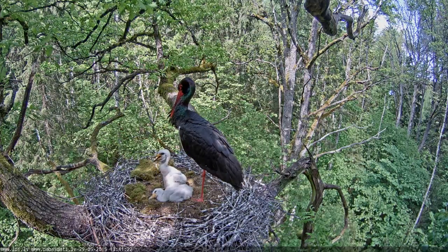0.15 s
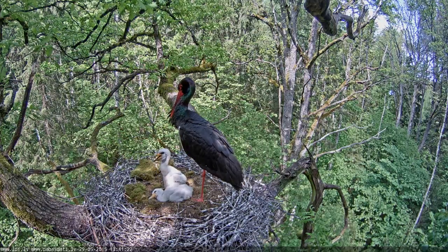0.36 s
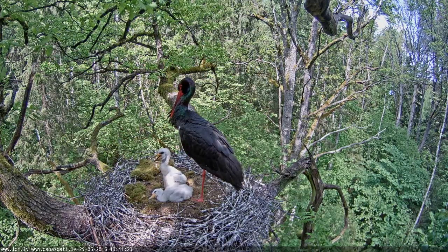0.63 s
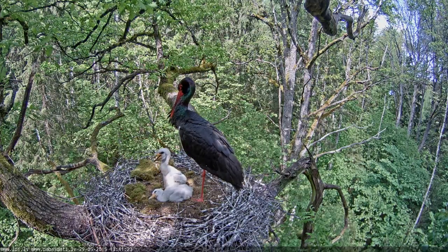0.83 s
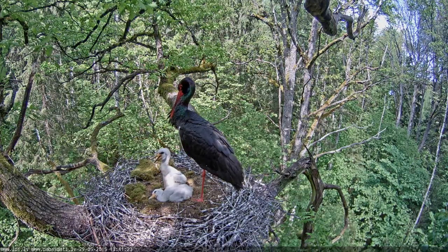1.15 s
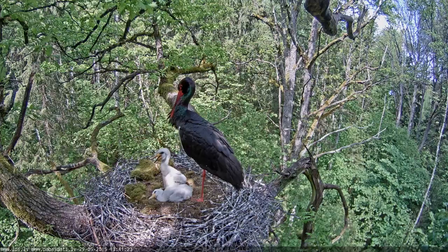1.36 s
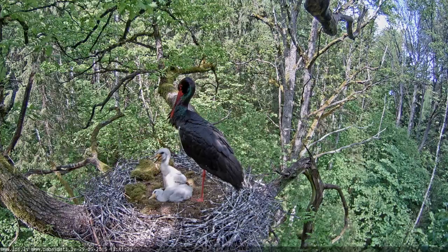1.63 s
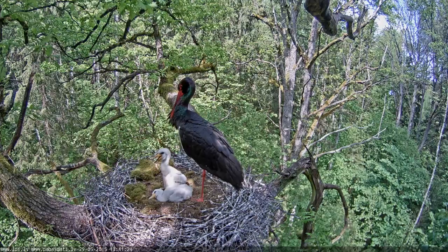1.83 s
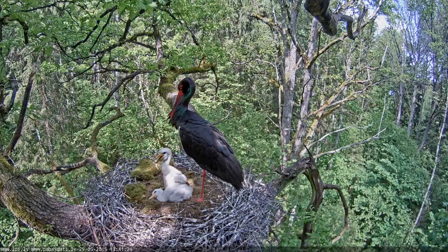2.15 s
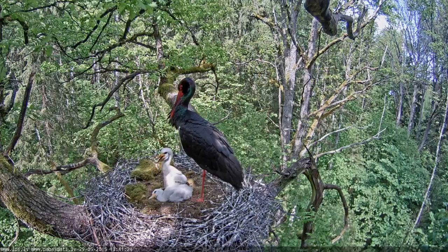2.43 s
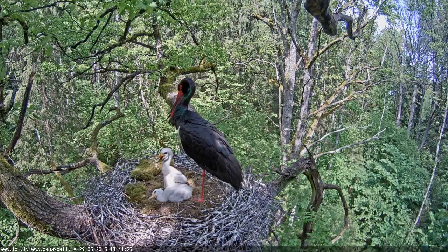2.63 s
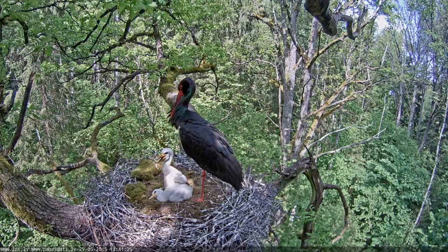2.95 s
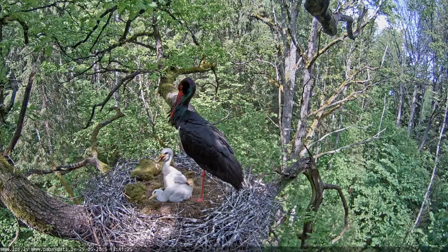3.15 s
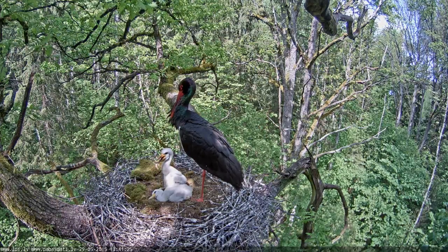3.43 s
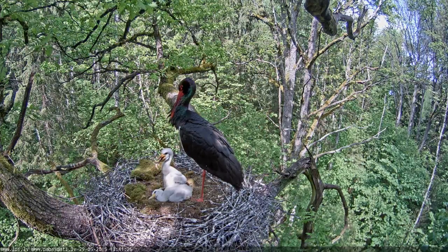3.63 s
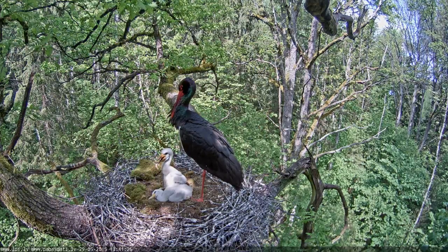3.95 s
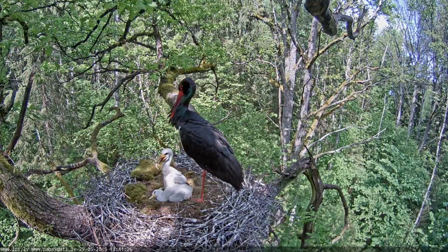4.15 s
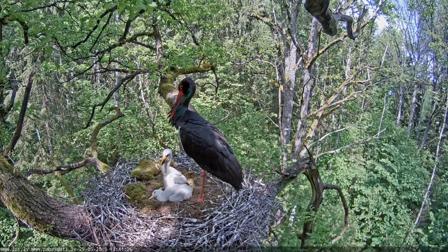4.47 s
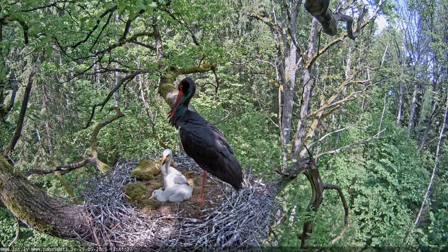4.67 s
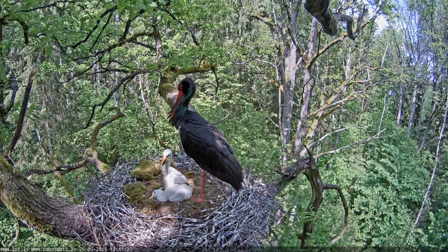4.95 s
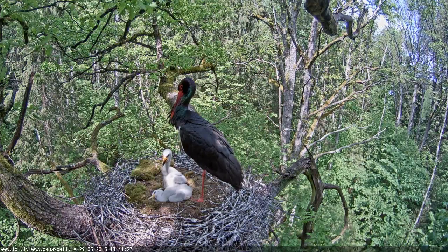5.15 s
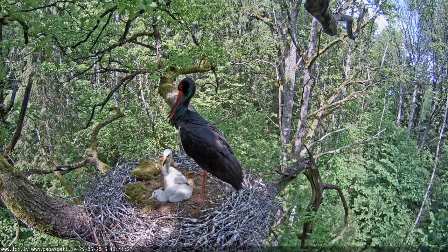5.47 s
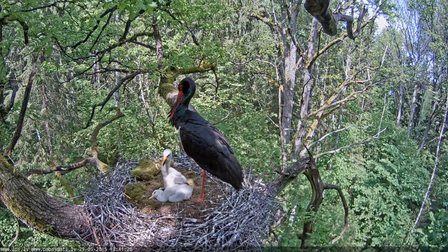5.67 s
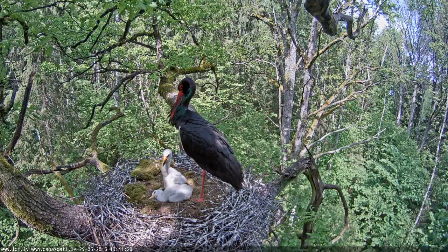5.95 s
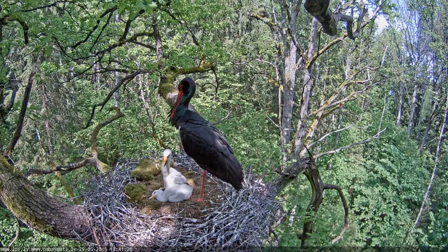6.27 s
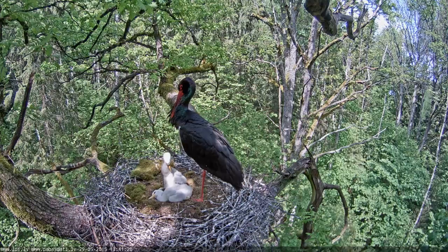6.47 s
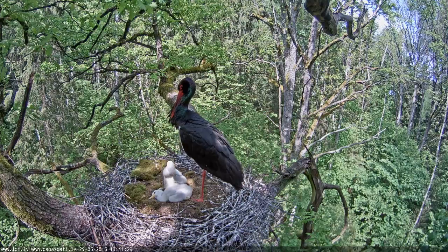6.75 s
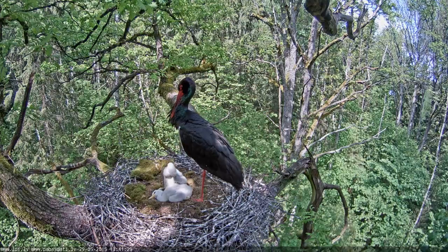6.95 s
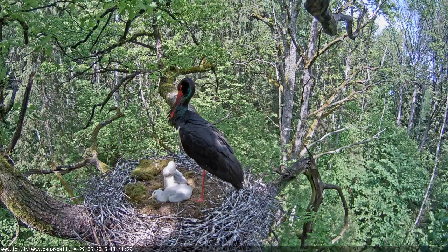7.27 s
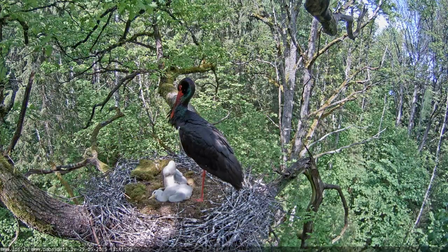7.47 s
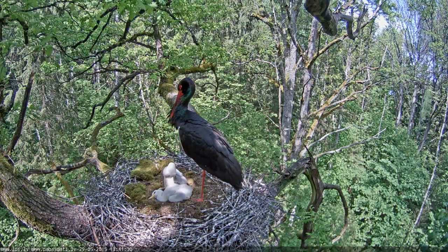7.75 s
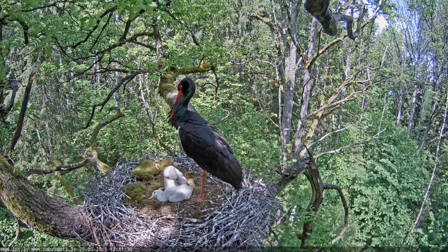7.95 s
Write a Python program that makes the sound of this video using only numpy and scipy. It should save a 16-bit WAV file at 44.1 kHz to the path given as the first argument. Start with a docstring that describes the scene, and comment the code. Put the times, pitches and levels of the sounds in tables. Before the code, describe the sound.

Forest birds sing scratchy phrases, a loud slurred whistle and thin squeaks above a steady hiss and faint trickling water.

```python
"""Spring forest, heard from a nest high in a tree.
Small birds chip far off over a distant chorus, a steady hiss and a faintly bubbling brook.
From 1.2 s a bird sings two scratchy phrases with a buzzing syrinx. From 3.7 s a thrush whistles a loud
slurred phrase; a high twitter swells behind it. From 6.4 s, as the chorus fades, come two runs of hoarse
squeaks close by. Trunks and leaves scatter every note into a long tail."""
import sys
import numpy as np
from scipy import signal
from scipy.fft import rfft, irfft
from scipy.io import wavfile

SR = 44100
rng = np.random.default_rng(int(sys.argv[2]) if len(sys.argv) > 2 else 0)


def wrap_up_sound(samples):
    """Save the sound to the file named by the first command line argument, as 16-bit audio."""
    columns = np.atleast_2d(samples).T
    # keep every value between -1 and 1, then stretch to whole-number steps
    tamed = np.clip(columns, -1, 1)
    steps = np.round(tamed * 32767).astype(np.int16)
    wavfile.write(sys.argv[1], SR, steps)


N = 357651


def thrush(beam_hz=3000, top_hz=3250, dry_db=-1.0, wet_db=-1.5, near_db=-16):
    """The beak beams the higher pitches away into the trees, so they ring on the most."""
    # the bird turns from the nest toward the trees: t/s, echo send/dB
    turn = [(3.85, -3.5), (4.3, 2)]
    song = whistles(thrush_notes())
    outward = song * envelope(turn)
    beamed = signal.sosfilt(signal.butter(4, beam_hz, "high", fs=SR, output="sos"), outward)
    shaded = signal.sosfilt(signal.butter(3, top_hz, "low", fs=SR, output="sos"), beamed)
    tail = from_db(wet_db) * forest(shaded, build_s=.009, early_db=-7, early_s=.08)
    near = from_db(near_db) * forest(outward, build_s=.035, early_db=-3, early_s=.1)
    return from_db(dry_db) * song + tail + near


def thrush_notes(slur_attack_s=.021, rise_len_s=.245, rise_attack_s=.049):
    """Single whistles and two refrains, each a quick slur down and a long rise."""
    # overlapping whistles use both sides of the syrinx; the last four join into a swoop:
    # t/s, length/s, start f/Hz, mid f/Hz, end f/Hz, level/dB, attack/s
    singles = [ (3.690, .102, 2860, 2622, 2650, -22, 0.053), (3.895, 0.04, 2605, 2623, 2700, -32.5, 0.0074),
               (3.940, .130, 1610, 1950, 2030, -37.5, 0.023), (3.968, 0.1, 3400, 3590, 3510, -23, 0.025),
               (5.668, 0.05, 2770, 2510, 2380, -31.5, 0.0065),
               (5.678, 0.038, 4120, 3620, 3400, -24.5, 0.0035),
               (5.726, 0.052, 2310, 2610, 3060, -22.5, 0.023),
               (5.822, .064, 3545, 2976, 2870, -15.5, 0.053), (6.067, .018, 4700, 3620, 3170, -24, .003),
               (6.088, 0.022, 2770, 2455, 2340, -23, 0.0017),
               (6.106, .029, 2270, 2083, 2330, -28.5, 0.0023), (6.131, 0.01, 2330, 2443, 2800, -20, .002)]
    # refrain contours at even steps: f/Hz (the rise before its pitch factor)
    slur_hz = (2896, 2620, 2280, 1930, 1830)
    rise_hz = (2560, 2745, 3020, 3180, 3130)
    # slur t/s, slur length/s, slur level/dB, rise t/s, rise pitch factor, rise level/dB
    refrains = [(4.279, .070, -24, 4.461, .994, -24.5), (4.904, .074, -20, 5.104, 1.01, -21.5)]
    notes = list(singles)
    for slur_s, length_s, slur_db, rise_s, factor, rise_db in refrains:
        notes.append((slur_s, length_s, *slur_hz, slur_db, slur_attack_s))
        notes.append((rise_s, rise_len_s, *(factor * np.array(rise_hz)), rise_db, rise_attack_s))
    return notes


def whistles(notes, waver_db=3.2, jitter=.0055, release_s=.008, onset_db=-16):
    """Nearly pure glides that swell, hold and stop; the throat makes loudness follow pitch."""
    # throat response, strongest mid-range with a dip just below: f/Hz, gain/dB
    throat = [(1700, -13.5), (2080, -5), (2270, -13), (2440, -2.5), (2720, 0.5), (2890, -1.5), (3080, -5),
              (3250, -15), (4600, -19.5)]
    out = np.zeros(N)
    for start_s, length_s, *glide_hz, db, attack_s in notes:
        t = np.arange(0, length_s, 1 / SR)
        arch_hz = arch(glide_hz, t / length_s)
        pitch_hz = arch_hz * (1 + jitter * flutter(len(t), 316))
        swell_db = onset_db * np.clip(1 - t / attack_s, 0, 1)
        throat_db = np.interp(arch_hz, *np.transpose(throat))
        level_db = db + swell_db + throat_db + waver_db * flutter(len(t), 112.4)
        gate = np.clip(t / .0016, 0, 1) * np.clip((length_s - t) / release_s, 0, 1)
        add(out, start_s, gate * from_db(level_db) * tone(pitch_hz))
    return out


def scratchy_singer(dry_db=-3.0, wet_db=-4.0):
    """Two hurried, buzzing phrases from deeper among the trees: zip, hook and rasps, flicks between."""
    # motifs: delay/s, length/s, start f/Hz, mid f/Hz, end f/Hz, level/dB, rasp
    up_zip = [(.018, .018, 2780, 3330, 3890, 0, .7), (0, .042, 2320, 2480, 2520, -3.5, .45),
              (.016, .028, 1660, 1860, 1920, -4.5, .35)]   # three rising voices
    hook = [(0, .014, 2300, 2580, 2760, 0, .15), (.011, .016, 2700, 2830, 2780, -5.5, .1),
            (.018, .038, 2270, 2260, 2250, -1.5, .1)]   # jumps up, settles lower
    flick = [(0, .024, 4450, 4180, 3880, -.5, .4)]   # quick fall
    # events: t/s, first voice's mid f/Hz, level/dB
    zips = [(1.175, 3303, -41.5), (2.248, 3360, -39.5)]
    hooks = [(1.342, 2526, -32.5), (2.439, 2624, -28)]
    flicks = [(1.208, 4170, -39), (2.281, 4210, -42), (2.489, 4120, -44), (2.612, 3900, -37.5)]
    voices = repeat(up_zip, zips) + repeat(hook, hooks) + repeat(flick, flicks) + rasps()
    song = syllables(voices, buzz_hz=135, swing_hz=150, scatter_hz=190, throb=1.0)
    return from_db(dry_db) * song + from_db(wet_db) * forest(song, build_s=.0018, early_db=6.5, early_s=.12)


def rasps(low_lead_s=.028, low_len_s=.0563, low_db=-8, top_lead_s=.009, top_db=-1.5):
    """A note is held, a low voice joins near its end, and it breaks upward."""
    # three a phrase, each hoarser: t/s, hold/s, held f/Hz, top note length/s, level/dB, rasp
    events = [(1.413, .087, 2610, 0.043, -35, 0.65), (1.606, 0.046, 2474, 0.0427, -34, 0.87),
              (1.696, .05, 2540, 0.0645, -35.5, 0.94), (2.555, 0.049, 2526, 0.019, -34.5, 0.5),
              (2.707, 0.049, 2546, 0.0445, -34.5, 0.87), (2.809, 0.053, 2523, .05, -36.5, 1)]
    # start, mid, end before transposing
    held_hz, low_hz, top_hz = (2524, 2588, 2727), (1803, 1990, 1990), (3087, 3380, 3380)
    voices = []
    for start_s, hold_s, hz, top_len_s, db, rasp in events:
        motif = [(0, hold_s, *held_hz, 0, rasp),
                 (hold_s - low_lead_s, low_len_s, *low_hz, low_db, .67 * rasp),
                 (hold_s - top_lead_s, top_len_s, *top_hz, top_db, 1.52 * rasp)]
        voices += repeat(motif, [(start_s, hz, db)])
    return voices


def squeaker(dry_db=-1.5, wet_db=-2.0):
    """Two runs of thin, hoarse squeaks that climb in pitch; nearby leaves give a short echo."""
    # motifs: delay/s, length/s, start f/Hz, mid f/Hz, end f/Hz, level/dB, rasp
    run_up = [(.031, .008, 2950, 2650, 2450, 0, .5), (0, .024, 4370, 4440, 4610, -15, .45),
              (.039, .037, 5900, 4550, 3800, -8.5, .65), (.115, .08, 4300, 5100, 5700, -16.5, 1)]   # tick, soft lead-in starting just before it, down sweep, hoarse climb
    squeak = [(0, .044, 7050, 7250, 7300, 0, .45), (.034, .03, 7500, 7950, 7200, -3.5, .3),
              (0, .08, 5900, 6350, 6500, -3.5, .9)]   # held note over a hoarse lower voice, then a small arch
    # events: t/s, first voice's mid f/Hz, level/dB
    run_ups = [(6.388, 2593, -39.5), (7.779, 2680, -39)]
    squeaks = [(6.513, 6560, -54.5), (6.622, 7000, -56.5), (6.727, 7280, -58), (6.888, 7280, -57),
               (7.928, 6420, -57), (8.020, 7100, -55)]
    voices = repeat(run_up, run_ups) + repeat(squeak, squeaks)
    song = syllables(voices, buzz_hz=189.5, swing_hz=250, scatter_hz=580, throb=.22)
    return from_db(dry_db) * song + from_db(wet_db) * forest(song, build_s=.0035, early_db=7, early_s=.087)


def small_birds(dry_db=-1.0, wet_db=1.5, pipe_rasp=.2):
    """Thin chips and pipes far off, slightly more echo than direct sound."""
    # motifs: delay/s, length/s, start f/Hz, mid f/Hz, end f/Hz, level/dB, rasp
    up_chip = [(0, .018, 4230, 4280, 4650, 0, .4)]
    down_chip = [(0, .05, 5150, 4870, 4720, -1, .5)]
    # events: t/s, mid f/Hz, level/dB
    up_chips = [(.080, 4450, -51), (.242, 4190, -48.5), (0.415, 4300, -48), (.583, 4260, -57)]
    down_chips = [(.085, 4880, -56.5), (.440, 4780, -53), (0.739, 4370, -56), (1.215, 4950, -52),
                  (1.668, 4850, -50.5), (1.855, 4830, -50), (2.524, 4740, -56), (2.873, 4820, -56.5),
                  (3.558, 4360, -55)]
    # flat whistles: t/s, length/s, f/Hz, level/dB
    pipes = [(0.127, 0.056, 3370, -49.5), (.220, 0.047, 3320, -48), (0.348, 0.033, 2994, -47),
             (0.64, 0.024, 3280, -49), (0.811, 0.035, 3750, -51), (3.697, 0.089, 3750, -51),
             (5.99, 0.028, 4570, -47), (6.855, 0.033, 3680, -71), (7.082, .055, 3660, -69),
             (7.47, 0.085, 3426, -51.5), (7.650, .16, 3500, -55)]
    # one very fast fall: t/s, length/s, start f/Hz, mid f/Hz, end f/Hz, level/dB, rasp
    tsip = (5.973, .012, 5900, 4500, 4100, -46, .3)
    voices = repeat(up_chip, up_chips) + repeat(down_chip, down_chips)
    voices += [(start_s, length_s, hz, hz, hz, db, pipe_rasp) for start_s, length_s, hz, db in pipes]
    song = syllables(voices + [tsip], buzz_hz=107, swing_hz=129, scatter_hz=202, throb=.24)
    echo = forest(song, build_s=.0048, early_db=-16, early_s=.086)
    return from_db(dry_db) * song + from_db(wet_db) * echo


def syllables(voices, buzz_hz, swing_hz, scatter_hz, throb):
    """Short arched chirps; rasp scales the syrinx's buzz, which shakes pitch and level together."""
    out = np.zeros(N)
    for start_s, length_s, *glide_hz, db, rasp in voices:
        u = np.linspace(0, 1, max(int(length_s * SR), 16))
        buzz = tone(buzz_hz * (1 + .072 * flutter(len(u), 48)))
        pitch_hz = arch(glide_hz, u) + rasp * (swing_hz * buzz + scatter_hz * flutter(len(u), 1513))
        level = signal.windows.tukey(len(u), .4) * (1 + np.clip(throb * rasp, 0, 1) * buzz)
        add(out, start_s, from_db(db) * level * tone(pitch_hz))
    return out


def repeat(motif, events):
    """A motif's voices, moved to each event's time, pitch and level."""
    home_hz = motif[0][3]
    return [(start_s + delay_s, length_s, *(np.array(glide_hz) * hz / home_hz), db + voice_db, rasp)
            for start_s, hz, db in events for delay_s, length_s, *glide_hz, voice_db, rasp in motif]


def forest(x, build_s, early_db, early_s, t60_s=1.65):
    """Echoes off trunks and leaves: a cluster from the nearest trees, then a long dense tail."""
    t = np.arange(3 * SR // 2) / SR
    paths = rng.standard_normal(len(t))
    for _ in range(2):   # flatten the spectrum: open woods have no resonances
        cells = signal.stft(paths, nperseg=2048)[2]
        paths = signal.istft(cells / (np.abs(cells) + 1e-20))[1][:len(t)]
    fade = from_db(-60 * t / t60_s) + from_db(early_db) * np.exp(-t / early_s)
    echoes = paths * fade * (1 - np.exp(-t / build_s))
    return signal.fftconvolve(x, echoes / np.linalg.norm(echoes))[:N]


def far_chorus():
    """Many birds on all sides, too far to tell apart."""
    # t/s, level/dB
    swells = [(0, -53.5), (.6, -57), (1.2, -50.5), (2.2, -57), (3.1, -55), (3.55, -58), (4.6, -50),
              (5.6, -53), (6.4, -65), (7.1, -104), (8.1, -78)]
    wash = sum(far_birds(count=230, low_hz=2150, high_hz=4400, slur=.106, dull_db=-11) for _ in range(3))
    return rms_one(wash) * envelope(swells)


def far_twitter():
    """A high singer so deep in the trees that only its echo arrives."""
    # t/s, level/dB
    swells = [(0, -59.5), (.9, -63), (1.2, -80), (5.1, -80), (5.38, -66), (5.8, -58), (6.1, -78)]
    wash = far_birds(count=500, low_hz=3600, high_hz=4700, slur=.09, dull_db=-6)
    return rms_one(wash) * envelope(swells)


def far_birds(count, low_hz, high_hz, slur, dull_db, note_s=.0453):
    """Random slurs arriving only as echo; distance dulls the high ones."""
    song = np.zeros(N)
    u = np.linspace(-1, 1, int(SR * note_s))
    for start_s, (late, pitch, turn, loud) in zip(np.linspace(0, N / SR, count), rng.random((count, 4))):
        hz = low_hz * (high_hz / low_hz) ** pitch * (1 + slur * (2 * turn - 1) * u)
        gain = np.sqrt(np.sin(np.pi * pitch)) * from_db(dull_db * pitch ** 2 + 8 * loud)
        add(song, start_s + .04 * late, gain * np.hanning(len(u)) * tone(hz))
    echo = forest(song, build_s=.004, early_db=13, early_s=.083)
    return np.pad(echo[SR // 2:], (0, SR // 2), mode="wrap")   # singing already under way at t = 0


def brook(count=70, small_db=-61, small_rise=.16, ring_cycles=31, wet_db=-9):
    """Bubbles ring and rise in pitch as they surface; small ones come at random."""
    # larger bubbles: t/s, mid f/Hz, rise as a share of f, level/dB
    large = [(.250, 950, 0.13, -52), (.325, 1215, 0.75, -45.5), (.605, 1545, .14, -48.5),
             (1.507, 470, 0.36, -38), (2.834, 765, 0.5, -48), (3.140, 965, .12, -51),
             (4.573, 1013, 0.75, -49), (5.533, 950, 0.21, -47), (5.590, 700, 0.21, -51),
             (6.839, 1360, .1, -52), (6.994, 1320, .1, -48.5), (7.445, 1330, .2, -49),
             (7.621, 663, 0.37, -52.5), (7.866, 700, 0.11, -54)]
    small = [(when * N / SR, 1750 - 1075 * size, small_rise, small_db + 6 * loud)
             for when, size, loud in rng.random((count, 3))]
    out = np.zeros(N)
    for start_s, hz, rise, db in large + small:
        u = np.linspace(0, 1, int(ring_cycles / hz * SR))
        level = from_db(db) * (1 - np.exp(-14 * u)) * (1 - u ** 2)
        add(out, start_s, level * tone(hz * (1 + rise * (u - .5))))
    return out + from_db(wet_db) * forest(out, build_s=.004, early_db=19, early_s=.04)


def hiss(rms_db=-48.5):
    """Steady noise of leaves, water and microphone, with a hump in the low treble."""
    # f/Hz, relative density/dB
    spectrum = [(20, 1), (60, -4.5), (150, -7), (400, -9), (800, -12.5), (1400, -9.5), (2100, -6.5),
                (2900, -4.5), (3600, -5), (4400, -18), (5400, -24), (8000, -26), (14000, -26.5)]
    hz, db = np.transpose(spectrum)
    bins_hz = np.maximum(np.fft.rfftfreq(N, 1 / SR), 1)
    colour = from_db(np.interp(np.log(bins_hz), np.log(hz), db))
    return from_db(rms_db) * rms_one(irfft(rfft(rng.standard_normal(N)) * colour, N))


def arch(glide_hz, u):
    """Polynomial through evenly spaced pitches, at u in 0-1."""
    knots = np.linspace(0, 1, len(glide_hz))
    return np.polyval(np.polyfit(knots, glide_hz, len(glide_hz) - 1), u)


def tone(hz):
    """Sine along a pitch curve."""
    return np.sin(2 * np.pi * np.cumsum(hz) / SR)


def flutter(size, rate_hz):
    """Random wobble, spread near 1."""
    steps = rng.standard_normal(1024)
    return np.interp(np.arange(size) * rate_hz / SR, np.arange(len(steps)), steps)


def envelope(points):
    """Gain curve through (t/s, level/dB) points."""
    return from_db(np.interp(np.arange(N) / SR, *np.transpose(points)))


def from_db(db):
    """Decibels to gain."""
    return 10 ** (np.asarray(db) / 20)


def rms_one(x):
    """Scale to rms 1."""
    return x / np.sqrt(np.mean(x ** 2) + 1e-20)


def add(track, start_s, sound):
    """Mix a sound into a track."""
    at = int(np.clip(start_s * SR, 0, N))
    track[at:at + len(sound)] += sound[:N - at]


def scene():
    """Birds near and far over hiss and brook, mono."""
    background = hiss() + far_chorus() + brook()
    return (background + thrush() + scratchy_singer() + small_birds() + squeaker() + far_twitter())[None]


def record(dry, cutoff_hz=13990, dc_offset=.0057):
    """Steep low-pass; the converter sits slightly off zero."""
    low_pass = signal.firwin(1001, cutoff_hz, fs=SR)
    return signal.fftconvolve(dry, low_pass[None], mode="same", axes=1) + dc_offset


dry = scene()
out = record(dry)
wrap_up_sound(out)
```